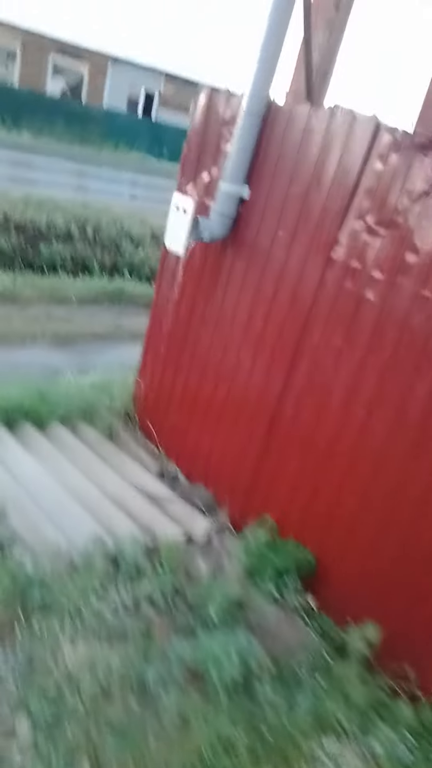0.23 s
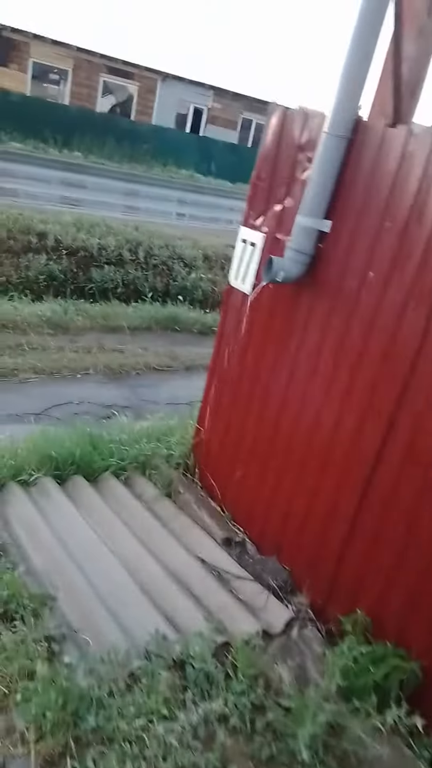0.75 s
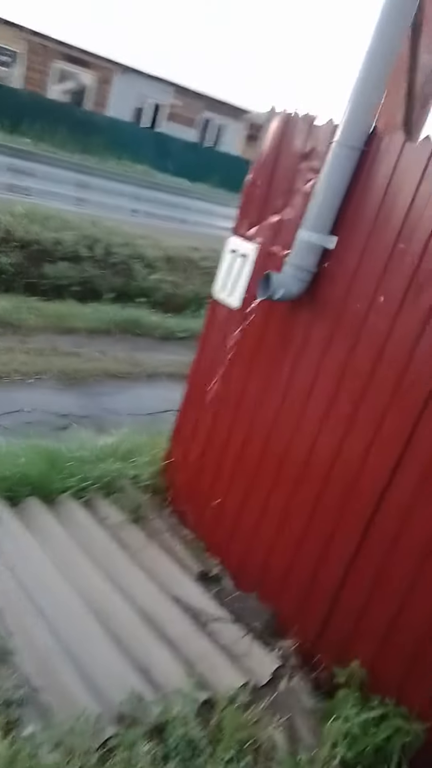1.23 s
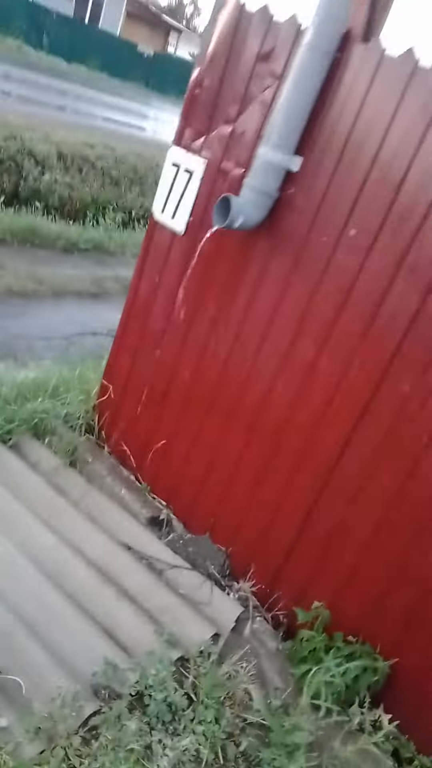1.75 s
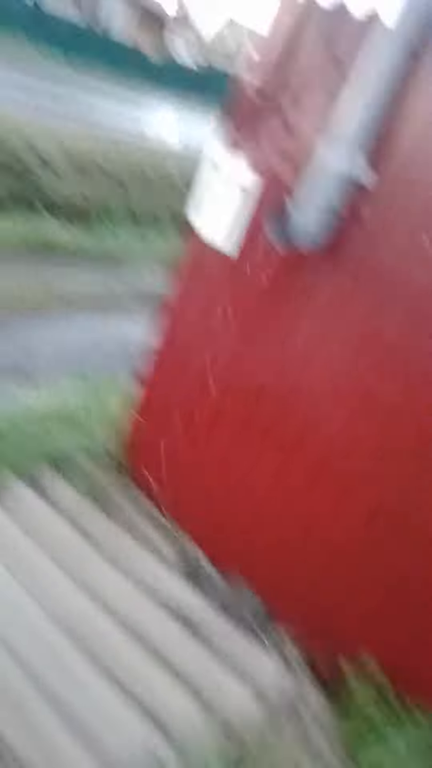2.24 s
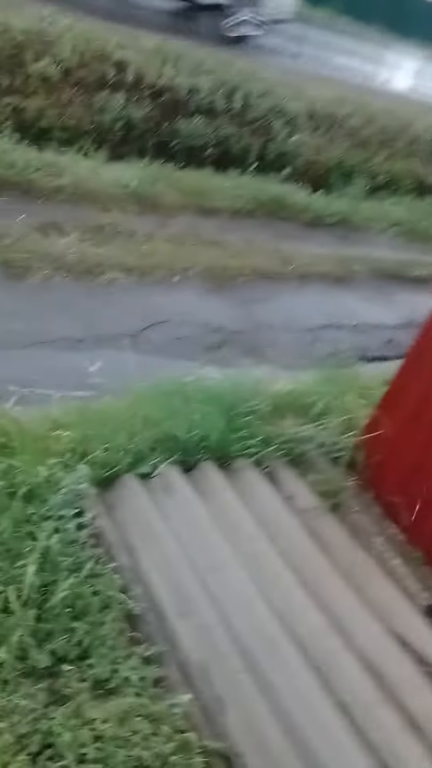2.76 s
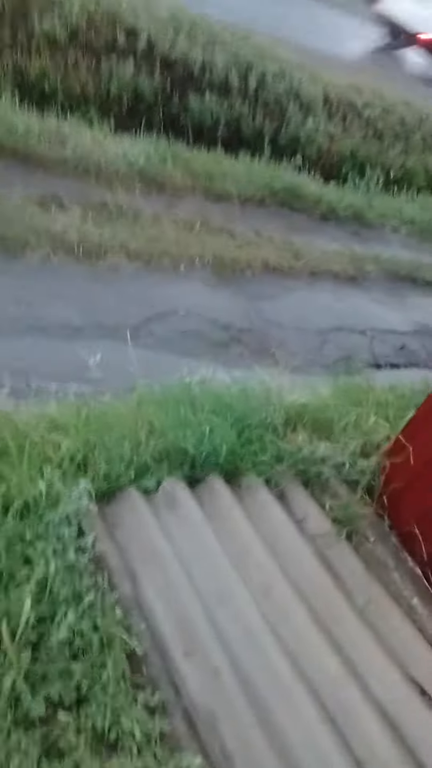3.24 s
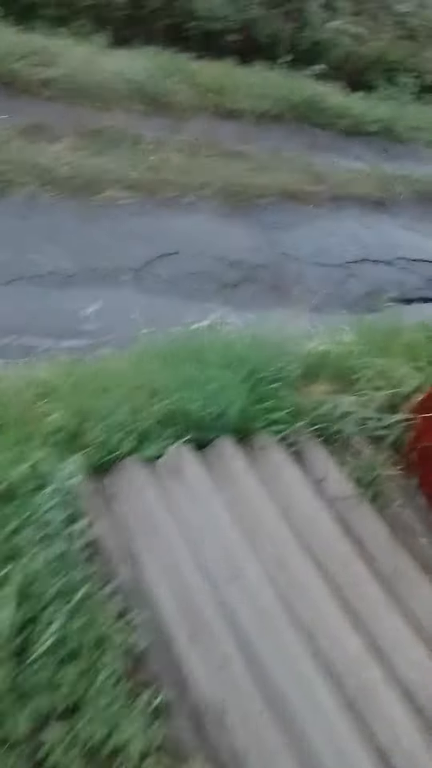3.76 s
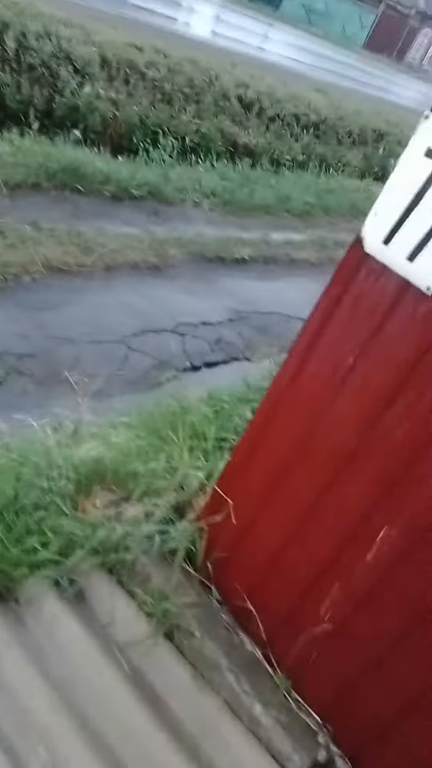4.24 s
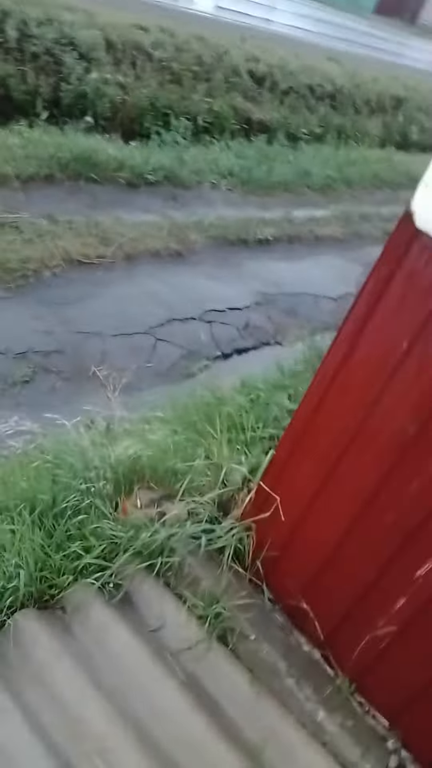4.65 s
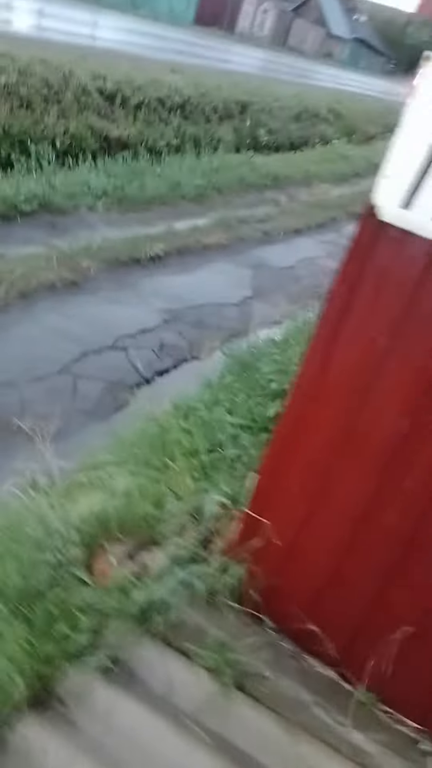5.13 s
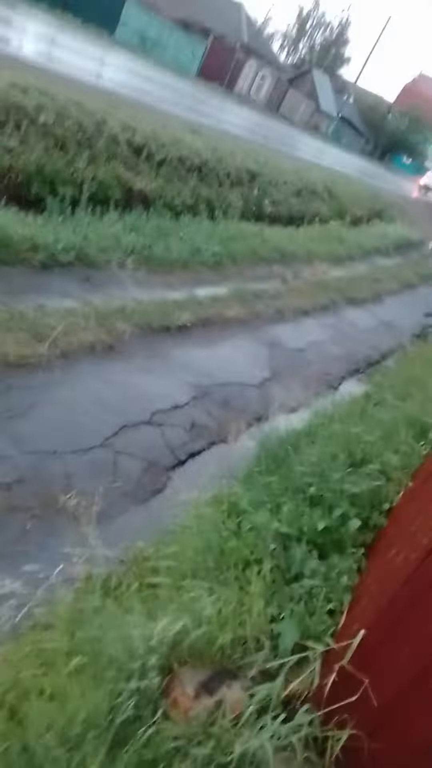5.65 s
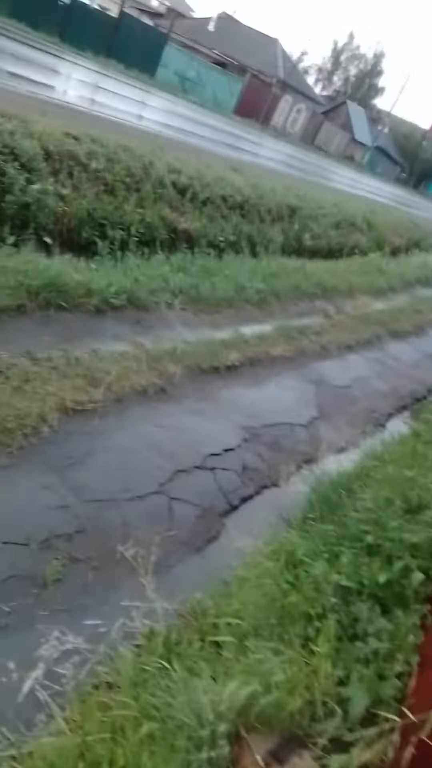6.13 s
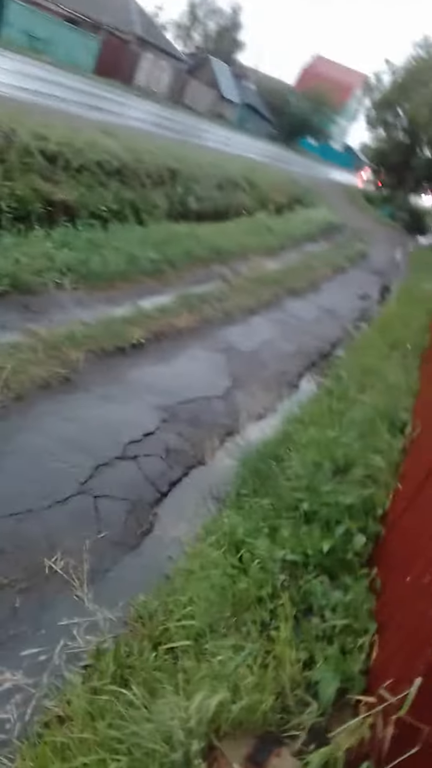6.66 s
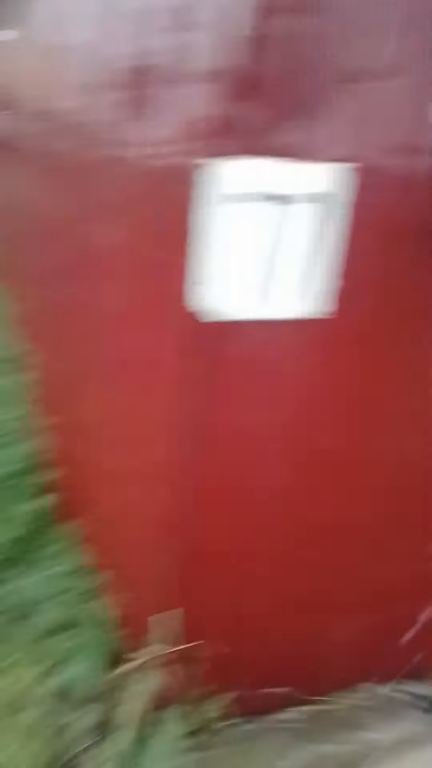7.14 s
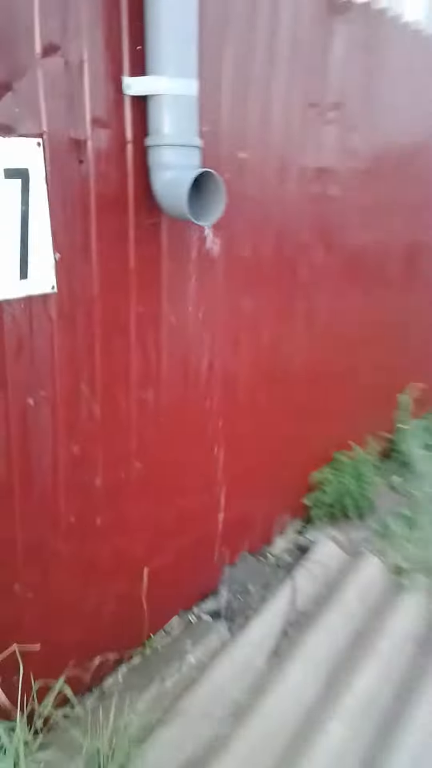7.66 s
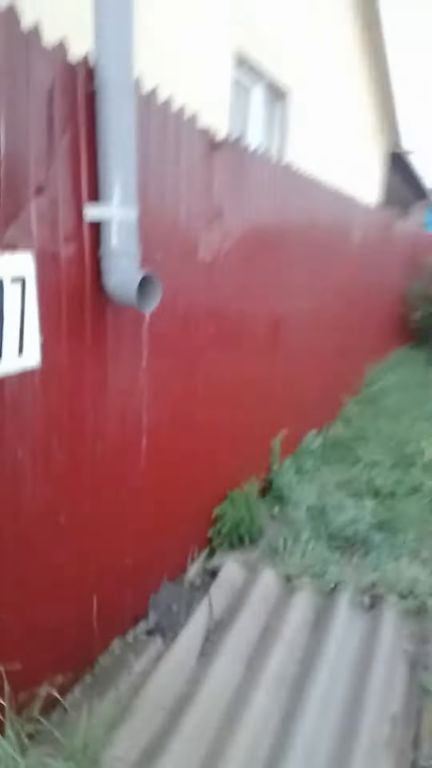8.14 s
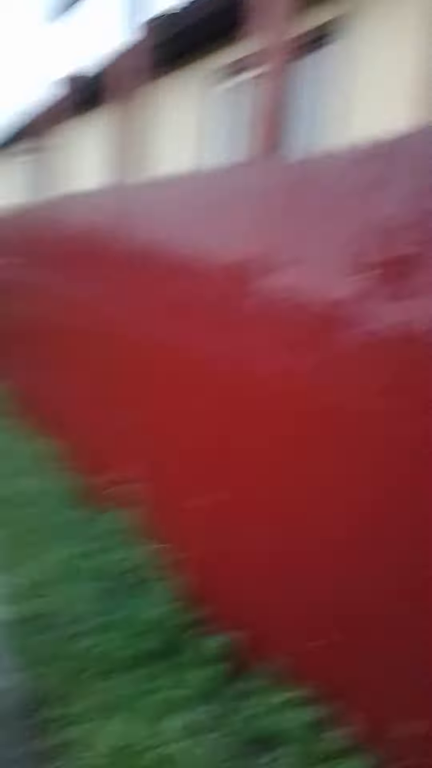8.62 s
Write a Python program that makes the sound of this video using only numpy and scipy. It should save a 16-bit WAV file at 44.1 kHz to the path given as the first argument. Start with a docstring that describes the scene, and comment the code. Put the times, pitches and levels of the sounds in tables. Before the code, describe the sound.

Outdoors beside a metal fence on a wet village street, a car approaches with a steady tyre hiss that swells into roaring spray and puddle slaps around two seconds, passes, and fades with its low engine note sinking. Faint traffic wash continues farther off, while drainpipe drops spatter close to a handheld microphone with a bright, slightly thin tone.

```python
"""A car comes on along a wet village road, heard from a gate beside a sheet-metal fence, as soft steps thud on grass.
Its tyres roar, throw up water and slap through puddles: shaped noise and droplets, with short reflections sweeping.
It goes by at 2.7 s and the engine note, a stack of firing orders, sinks; a low rush of noise follows.
From 4 s drops of drainpipe water spatter near by and more traffic swells farther off, as gliding roar and hiss.
The spatter thickens after 7 s; faint drips tick, and steps thud and narrow bands of noise swell now and then."""
import sys
import numpy as np
from scipy import signal
from scipy.fft import rfft, irfft, next_fast_len
from scipy.io import wavfile
from scipy.ndimage import map_coordinates

SR = 44100
rng = np.random.default_rng(int(sys.argv[2]) if len(sys.argv) > 2 else 0)


def wav_record(signal):
    """Record a signal, one row per channel, as 16-bit PCM in the file named by sys.argv[1]."""
    frames = np.transpose(np.atleast_2d(signal))
    bounded = np.clip(frames, -1, 1)
    # unit amplitude maps onto the largest positive 16-bit level
    quanta = np.round(bounded * 32767).astype(np.int16)
    wavfile.write(sys.argv[1], SR, quanta)


N = 392049
T = np.arange(N) / SR   # time in s

# Drops of drainpipe water close by: [t/s, relative level/dB, ring f/Hz, burst/ms, crackle against ring/dB]
WATER_DROPS = [(4.131, -26, 10980, 1.3, -2), (4.92, -32, 11000, 1.3, -2), (5.349, -29, 9970, 1.3, -2),
               (5.6558, -27, 10000, 1.3, -2), (7.2502, -15, 5200, 1.5, 3), (7.2775, -14.5, 4930, 1.5, -9),
               (7.311, -17, 6000, 1.6, 1), (7.377, -37, 9500, 7, -4), (7.4025, -24, 8100, 2.5, -4),
               (7.44, -30, 8200, 3.5, -1), (7.451, -22, 5500, 2, -5), (7.461, -32, 8000, 2, -7),
               (7.4924, -13.5, 5300, 1.5, -4), (7.501, -17, 5100, 1.5, -13), (7.527, -28, 9500, .7, -3),
               (7.607, -32, 8700, 4, -4), (7.704, -35, 8000, 2, -4), (7.812, -30, 7500, 2, -3),
               (7.8469, -21, 5470, 1.5, -3), (7.858, -28, 9500, 2.5, -2), (7.8698, -19, 6000, 1.3, 0),
               (7.934, -29, 7500, 1.3, 0), (7.958, -28, 9000, 1.3, -2), (7.9783, -19, 7350, 1.5, -4)]
# Soft steps and handling thuds: [t/s, level/dB, bell length/s, centre f/Hz]
SOFT_THUDS = [(.12, -45, .022, 110), (.22, -42, 0.063, 188), (.68, -44, 0.013, 109), (.86, -37, 0.022, 134),
              (1.545, -33, 0.01, 159), (1.655, -35, 0.017, 138), (4.04, -35.5, 0.017, 230),
              (4.05, -39, 0.024, 115), (4.085, -39, .014, 190), (6.74, -45, 0.012, 125),
              (8.73, -37, .01, 110), (8.775, -37.5, 0.0043, 167)]
# Faint bright rustles: [t/s, level/dB, bell length/s, centre f/Hz]
BRIGHT_RUSTLES = [(5.3, -51, .05, 12500), (6.76, -57, 0.08, 12500)]
DRIPS_PER_S, DRIPS_DB = 21, -33

# Swells of farther traffic: [t/s, length/s, tread level/dB, tread f/Hz, glide/Hz (added coming, taken off going),
# hiss level/dB, reflection lag/ms, lag drift/(ms per s), reflection strength 0-1]
FAR_PASSES = [(4.47, 0.19, -43.5, 986, -40.5, -40, 1.1, 0, .25),
              (5.095, 0.3, -48, 1085, -1.5, -46, 0.92, 0, 0.4),
              (6.3, 0.46, -45.5, 981, -30, -46, 1.3, 0, .15),
              (7.419, 0.33, -43, 919, 130, -38.5, 1.12, .2, 0.2),
              (8.448, 0.79, -47.5, 1147, 60, -39, 0.71, 0, 0.13)]
# Colour of the farther hiss: [f/Hz, level/dB per Hz]
FAR_HISS_COLOUR = [(900, -35), (1400, -6), (1950, 4), (2300, 0.5), (2750, 1.5), (3500, -3), (4500, -3.5),
                   (6000, -31), (9000, -29)]
FAR_TREAD_WIDTH_HZ, FAR_HISS_LAG_S = 340, 0.14

# Narrow bands of noise: tyre tones, and a quick squelch with a rising chirp at a splash:
# [t/s, bell length/s, level/dB, f/Hz, glide/(Hz per s), width/Hz]
NARROW_BANDS = [(.7, 0.27, -39, 3070, 0, 453), (1.349, 0.48, -33.5, 1910, 60, 800),
                (2.12, .012, -37, 1556, 9000, 150), (2.153, .008, -29, 2500, 55001, 300),
                (2.68, 0.11, -37, 862, -200, 360), (2.979, 0.11, -33.5, 1031, 899.5, 300),
                (3.418, 0.31, -37.5, 2913, 300, 450), (3.502, 0.16, -43, 1617, 300.5, 350),
                (4.6, 0.42, -48, 4760, 0, 450), (5.1, .07, -42, 3320, -0.5, 400),
                (5.418, 0.24, -42.5, 2210, -150, 400), (5.36, 0.12, -41, 4420, -1.5, 500),
                (5.972, 0.099, -45, 5950, -400, 450), (6.45, 0.47, -45.5, 1390, 1, 252),
                (7.15, 0.089, -43, 1035, -250, 250), (7.3, 0.26, -45, 1887, -300, 280),
                (7.58, 0.16, -40.5, 2715, -150, 550), (7.981, .09, -44, 2040, -700, 400)]

# Colours of the car's tyre sounds, from low rumble to fine mist: [f/Hz, level/dB per Hz]
RUMBLE_COLOUR = [(20, -43), (40, -43), (70, -15), (120, -8), (170, -5), (230, 0.5), (300, 0.5), (390, 0.5),
                 (490, 0.5), (580, -3), (690, -4), (900, 1), (1600, -26)]
SLOSH_COLOUR = [(900, -60), (1250, -4), (1600, -1), (2200, 0), (3000, -2.5), (4000, -4.5), (6000, -8)]
SPRAY_COLOUR = [(2000, -7), (3200, -1), (4200, 2.5), (5400, 0.5), (6500, 3.5), (7600, 0), (8600, -9.5),
                (10000, -20.5), (14000, -53)]
MIST_COLOUR = [(5500, -12), (8000, 3), (9500, 0.5), (11500, -3), (13500, -4.5), (16000, -10)]
# Short puddle slaps, and longer swells of spray and bright mist: [t/s, level/dB, bell length/s, centre f/Hz]
PUDDLE_SPLASHES = [(.3, -31, 0.024, 1690), (1.353, -22, 0.005, 4970), (1.356, -24.5, 0.015, 1650),
                   (1.5, -33, 0.28, 12400), (1.535, -28, 0.008, 2000), (1.8, -22.5, 0.0075, 6500),
                   (1.87, -26, 0.011, 6400), (2.01, -29, 0.015, 6000), (2.14, -20, 0.012, 2650),
                   (2.28, -23.5, 0.12, 3130), (2.46, -21.5, 0.02, 6100), (2.95, -29, 0.15, 6830),
                   (2.97, -46, 0.14, 14000), (5.53, -38.5, 0.064, 6200)]
# Loudness of the wet tyres, which steers rumble, tread and thrown water: [t/s, level/dB]
WET_TYRE_LEVEL = [(0, -25), (.28, -24.5), (.6, -26.5), (1.05, -24.5), (1.38, -21.5), (1.7, -18),
                  (1.82, -16), (2.05, -13.5), (2.35, -17.5), (2.95, -19.5), (3.15, -22), (3.42, -24.5),
                  (4.05, -34), (5.15, -34), (5.52, -33.5), (5.9, -36), (7.15, -41.5), (8.62, -40.5),
                  (8.89, -34.5)]
ABREAST_S, PASS_S = 2.7, .35   # the car is nearest; time it takes to cover its distance from the gate
EMERGE_S, EMERGE_TAKES_S = 1.65, 0.16   # it comes out from behind the fence
# How each tyre sound follows the wet-tyre level: [level at the loudest hiss/dB, share of the hiss's swing,
# added coming on/dB, added abreast/dB, added behind the fence/dB]
RUMBLE_BALANCE = (-34.5, 0.5, 0.1, -1, 3.5)
TREAD_BALANCE = (-36, 0.42, 1.5, 0.5, 1)
SLOSH_BALANCE = (-21.5, 0.72, 0.64, -2, 0)
SPRAY_BALANCE = (-20, 0.9737, -1.8, 0.5, 3.5)
MIST_BALANCE = (-29, 0.93, 1.4, 6, -4)
# Trim of the finest mist, above 11.5 kHz: base, added coming on, added abreast
MIST_TOP_DB, MIST_TOP_AHEAD_DB, MIST_TOP_ABREAST_DB = -5, 3.5, -14
TREAD_HZ, TREAD_DIP_HZ, TREAD_WIDTH_HZ = 1056.7, 275, 410   # the roar sinks by the dip when abreast

# Engine firing rate: [t/s, f/Hz]
FIRING_RATE = [(0, 72), (1.1, 72), (1.5, 70.7), (1.95, 71.5), (2.18, 69.8), (2.4, 62.8), (2.58, 59),
               (2.75, 57.1), (2.97, 55.7), (3.15, 52.7), (3.3, 50.6), (3.6, 49.4), (3.95, 48.2),
               (4.3, 47.2), (6.1, 48.2), (7.7, 49.8), (8.89, 49)]
# Engine loudness: [t/s, level/dB]
ENGINE_LOUDNESS = [(0, -72.5), (.75, -66), (1, -57.5), (2, -47.5), (2.18, -49), (2.36, -46.5), (2.75, -42),
                   (3.05, -49), (3.3, -57), (4.25, -69), (5, -68.5), (5.6, -72.5), (7.2, -65),
                   (8.89, -74.5)]
# Firing orders 1 to 5: [relative level/dB, added abreast/dB, added coming on/dB]
FIRING_ORDERS = [(-11.5, 1, -6), (-1.5, -4.5, -0.5), (0, 2.5, -2), (-1, -3, -2.5), (-9, -2, -4)]
# Exhaust resonances: [f/Hz, width/Hz, boost/dB]
EXHAUST_BOOMS = [(144.1, 10, 13.5), (275, 15, 12)]
WAKE_S, WAKE_LENGTH_S, WAKE_DB, WAKE_HZ = 3.5, 0.41, -41.5, 504   # a low rush follows the car

# Short reflection from a near surface, its lag sweeping as the car goes by:
# [t/s, extra travel time/ms, strength 0-1]
NEAR_REFLECTION = [(0, .53, .04), (1.65, .5, .06), (1.85, .54, .12), (2.1, .61, .15), (2.4, .66, .12),
                   (2.58, .9, .12), (2.68, .95, .24), (2.9, .835, .24), (3.02, .74, .23), (3.18, .65, .23),
                   (3.4, .63, .21), (3.6, .585, .24), (3.78, .6, .21), (4, .7, .09), (4.3, .88, .05),
                   (5.2, .9, .07), (5.5, .975, .2), (5.8, .88, .08), (6.5, .66, .05), (8.89, .9, .05)]
# The reflected paths: [lag after the first path/ms, signed share of the reflection's strength]
REFLECTED_PATHS = [(0, 1), (.05, -.5), (.1, .65), (.24, -.5), (.44, .3), (.7, .3)]
REFLECT_BAND_HZ = (1900, 15500)   # mostly short waves are mirrored
REFLECT_FLICKER, REFLECT_JITTER_MS = .35, .008   # spread of strength and lag; the sweep is broken up
# One more reflection, of the lower range only, while the car is coming on
ONCOMING_LAG_MS, ONCOMING_STRENGTH, ONCOMING_BELOW_HZ = 0.52, 0.1, 4900

PORT_HZ, PORT_WIDTH_HZ, PORT_DB = 7124, 940, 9.5
CUTOFF_HZ = 15900


def from_db(db):
    """Decibels to gain."""
    return 10 ** (np.asarray(db) / 20)


def rms_one(x):
    """Scale to unit power."""
    return x / np.sqrt(np.mean(x ** 2) + 1e-20)


def in_time(rows):
    """One curve per column, joined by straight lines."""
    s, *columns = np.transpose(rows)
    return [np.interp(T, s, column) for column in columns]


def bell(s, length):
    """A smooth swell that peaks at 1 at time s."""
    return np.exp(-.5 * ((T - s) / length) ** 2)


def filtered(x, order, hz, kind):
    """Butterworth filter."""
    return signal.sosfilt(signal.butter(order, hz, kind, fs=SR, output="sos"), x)


def filtered_in_step(x, hz, kind):
    """Butterworth filter run both ways, so the result stays in step with x."""
    return signal.sosfiltfilt(signal.butter(2, hz, kind, fs=SR, output="sos"), x)


def drift(rate):
    """Smooth chance of spread 1, changing about rate times a second."""
    count = N // 20   # one value per 20 samples
    hz = np.fft.rfftfreq(count, 20 / SR)
    slow = irfft(rfft(rng.standard_normal(count)) / (1 + (hz / rate) ** 2))
    return np.interp(np.arange(N) / 20, np.arange(len(slow)), rms_one(slow))


def coloured(x, spectrum):
    """Give x a spectrum; unit power."""
    size = next_fast_len(N)
    hz, db = np.transpose(spectrum)
    log_hz = np.log(np.fft.rfftfreq(size, 1 / SR) + 1)
    gain = from_db(np.interp(log_hz, np.log(hz), db, left=-np.inf, right=-np.inf))
    return rms_one(irfft(rfft(x, size) * gain, size)[:N])


def resonate(x, hz, width_hz):
    """A resonance with gain 1 at its top."""
    r = np.exp(-np.pi * width_hz / SR)
    feed = np.array([1, 0, -1]) * (1 - r * r) / 2
    return signal.lfilter(feed, [1, -2 * r * np.cos(2 * np.pi * hz / SR), r * r], x)


def resonate_twice(x, hz, width_hz):
    """Two equal resonances in a row, for steeper sides."""
    return resonate(resonate(x, hz, width_hz), hz, width_hz)


def gliding_band(hz, width_hz):
    """A band of noise whose centre follows hz; unit power."""
    a, b = filtered(rng.standard_normal((2, N)), 2, width_hz / 2, "low")
    phase = 2 * np.pi * np.cumsum(hz) / SR
    return rms_one(a * np.cos(phase) + b * np.sin(phase))


def shaped(noise, envelope):
    """Noise under an envelope, with the energy of that envelope."""
    return rms_one(noise * envelope) * np.sqrt(np.mean(envelope ** 2))


def add(out, s, sound):
    """Mix a sound in at time s."""
    sound = sound[max(-int(s * SR), 0):]
    start = int(np.clip(s * SR, 0, N))
    out[start:start + len(sound)] += sound[:N - start]


def droplets(per_s, spread_db):
    """Tiny impacts at random moments, a few much larger than the rest."""
    born = rng.random(N) < per_s / SR
    size_db = spread_db * np.minimum(rng.exponential(1, N), 4)
    return born * rng.choice([-1, 1], N) * from_db(size_db)


def swells(rows, relative_width):
    """Bell-shaped bursts of noise, each in a broad resonance."""
    out = np.zeros(N)
    t = np.arange(-SR, SR) / SR
    for s, db, length, hz in rows:
        burst = resonate_twice(rng.standard_normal(len(t)), hz, relative_width * hz)
        add(out, s + t[0], from_db(db) * shaped(burst, np.exp(-.5 * (t / length) ** 2)))
    return out


def bearing(s, pass_s):
    """For a vehicle nearest at time s: ahead runs from 1 (coming) to -1 (going), abreast peaks at 1."""
    along = (s - T) / pass_s
    abreast = 1 / (1 + along ** 2)
    return along * np.sqrt(abreast), abreast


def reflected(x, mirror, paths):
    """The mirrored sound comes by longer paths (lag ms, strength) and cuts notches; power stays about the same."""
    out, power = x, 1
    for lag_ms, strength in paths:
        late = map_coordinates(mirror, [np.arange(N) - lag_ms * SR / 1000], order=3)
        out = out + strength * late
        power = power + strength ** 2
    return out / np.sqrt(power)


def drips():
    """Stray drips tick faintly at random moments."""
    return from_db(DRIPS_DB) * resonate(droplets(per_s=DRIPS_PER_S, spread_db=2.0), 9300, 4400)


def rustles():
    """Faint bright rustles are bell-shaped puffs of high noise."""
    return swells(BRIGHT_RUSTLES, relative_width=0.89)


def thuds():
    """Soft steps and handling thuds are short low bursts, kept clear of the deepest bass."""
    return filtered(swells(SOFT_THUDS, relative_width=0.89), 3, 55, "high")


def spatter(rise_s, decay_s, tail_db, tail_s, ring_width_hz):
    """Each drop bursts in a few milliseconds of bright crackle, then scatters faintly."""
    out, t = np.zeros(N), np.arange(SR // 20) / SR
    for s, db, hz, burst_ms, crackle_db in WATER_DROPS:
        after_burst = np.maximum(t - burst_ms / 1000, 0)
        fall = np.exp(-after_burst / decay_s) + from_db(tail_db) * np.exp(-t / tail_s)
        shape = (1 - np.exp(-t / rise_s)) * fall
        ring, crackle = rng.standard_normal((2, len(t)))
        burst = rms_one(resonate_twice(ring, hz, ring_width_hz)) + from_db(crackle_db) * crackle
        add(out, s, from_db(db - 12.5) * shaped(burst, shape))
    return filtered(out, 2, [2100, 13500], "band")


def far_traffic():
    """Each swell is a tread roar gliding in pitch, wet hiss just behind it and one reflection, with the bass cut."""
    out = 0
    for s, length, tread_db, tread_hz, glide_hz, hiss_db, lag_ms, ms_per_s, strength in FAR_PASSES:
        ahead, _ = bearing(s, length)
        tread = from_db(tread_db) * gliding_band(tread_hz + glide_hz * ahead, FAR_TREAD_WIDTH_HZ)
        hiss = from_db(hiss_db) * coloured(rng.standard_normal(N), FAR_HISS_COLOUR)
        swell = bell(s, length)
        late_swell = np.interp(T - FAR_HISS_LAG_S, T, swell)
        direct = tread * swell + hiss * late_swell
        out = out + reflected(direct, direct, [(lag_ms + ms_per_s * (T - s), strength)])
    return filtered(out, 4, 650, "high")


def narrow_bands():
    """Tyre tones, and a squelch and rising chirp at a splash: each a band of noise that swells and fades."""
    out = 0
    for s, length, db, hz, glide, width_hz in NARROW_BANDS:
        band = gliding_band(hz + glide * (T - s), width_hz)
        out = out + from_db(db) * bell(s, length) * band
    return out


def heard_db(balance):
    """Level of one tyre sound: it follows the hiss and shifts as the car emerges from the fence and goes by."""
    loudest_db, share, ahead_db, abreast_db, hidden_db = balance
    hiss_db, = in_time(WET_TYRE_LEVEL)
    ahead, abreast = bearing(ABREAST_S, PASS_S)
    # out from behind the fence there is more mist, less rumble and spray
    hidden = .5 + .5 * np.tanh((EMERGE_S - T) / EMERGE_TAKES_S)
    swing_db = share * (hiss_db - hiss_db.max())
    return loudest_db + swing_db + ahead_db * ahead + abreast_db * abreast + hidden_db * hidden


def wake():
    """A low rush of noise swells up behind the car."""
    return from_db(WAKE_DB) * bell(WAKE_S, WAKE_LENGTH_S) * gliding_band(np.full(N, WAKE_HZ), width_hz=360)


def engine():
    """The firing orders sink in pitch as the car goes by; whichever lies on an exhaust resonance booms."""
    hz, = in_time(FIRING_RATE)
    level_db, = in_time(ENGINE_LOUDNESS)
    phase = 2 * np.pi * np.cumsum(hz * (1 + 0.003 * drift(4.3))) / SR
    ahead, abreast = bearing(ABREAST_S, PASS_S)
    out = 0
    for k, (db, abreast_db, ahead_db) in enumerate(FIRING_ORDERS, 1):
        boom = 1
        for boom_hz, width_hz, boom_db in EXHAUST_BOOMS:
            off_centre = 2 * (k * hz - boom_hz) / width_hz
            boom = boom + (from_db(boom_db) - 1) / (1 + off_centre ** 2)
        order_db = level_db + db + abreast_db * abreast + ahead_db * ahead + 1.1 * drift(4.0)
        out = out + boom * from_db(order_db) * np.sin(k * phase)
    return out


def tyres():
    """The rolling tyres rumble, and air pumped from the tread roars near 1 kHz."""
    _, abreast = bearing(ABREAST_S, PASS_S)
    rumble = from_db(heard_db(RUMBLE_BALANCE)) * coloured(rng.standard_normal(N), RUMBLE_COLOUR)
    roar = gliding_band(TREAD_HZ - TREAD_DIP_HZ * abreast ** 2, TREAD_WIDTH_HZ)
    tread = from_db(heard_db(TREAD_BALANCE) + 1.0 * drift(22)) * roar
    return rumble + tread


def thrown_water():
    """Slosh, spray and mist: noise and countless droplets that the uneven water film makes surge together."""
    ahead, abreast = bearing(ABREAST_S, PASS_S)
    film = drift(13) * (1 + 0.65 * abreast)
    slosh_db = heard_db(SLOSH_BALANCE) + 0.2 * film + 0.78 * drift(11.0)
    slosh = from_db(slosh_db) * coloured(rng.standard_normal(N), SLOSH_COLOUR)
    spray_db = heard_db(SPRAY_BALANCE) + 0.93 * film + 0.27 * drift(35)
    spray = from_db(spray_db) * coloured(droplets(per_s=20000, spread_db=3.0), SPRAY_COLOUR)
    mist_db = heard_db(MIST_BALANCE) + .5 * film
    mist = from_db(mist_db) * coloured(droplets(per_s=12000, spread_db=3.0), MIST_COLOUR)
    top_db = MIST_TOP_DB + MIST_TOP_AHEAD_DB * ahead + MIST_TOP_ABREAST_DB * abreast
    top_trim = (from_db(top_db) - 1) * filtered_in_step(mist, 11500, "high")
    return slosh + spray + mist + top_trim


def splashes():
    """Puddle slaps in short bursts of resonant noise, and longer swells of spray and bright mist."""
    return swells(PUDDLE_SPLASHES, relative_width=0.64)


def car():
    """Tyres and water with their short reflections, the low rush behind, and the engine."""
    direct = tyres() + thrown_water() + splashes()
    ahead, _ = bearing(ABREAST_S, PASS_S)
    lows = filtered_in_step(direct, ONCOMING_BELOW_HZ, "low")
    direct = reflected(direct, lows, [(ONCOMING_LAG_MS, ONCOMING_STRENGTH * np.maximum(ahead, 0))])
    mirror = filtered_in_step(direct, REFLECT_BAND_HZ, "band")
    first_lag_ms, full_strength = in_time(NEAR_REFLECTION)
    paths = []
    for later_ms, share in REFLECTED_PATHS:
        lag_ms = first_lag_ms + later_ms + REFLECT_JITTER_MS * drift(14)
        strength = full_strength * share * (1 + REFLECT_FLICKER * drift(8.9))
        paths.append((lag_ms, strength))
    return reflected(direct, mirror, paths) + wake() + engine()


def scene():
    """The small sounds near by, the farther traffic and the car; alike in both ears."""
    drops = spatter(rise_s=0.00023, decay_s=0.00084, tail_db=-12.0, tail_s=0.0058, ring_width_hz=2800)
    near = drips() + rustles() + thuds() + drops
    return np.tile(near + far_traffic() + narrow_bands() + car(), (2, 1))


def record(dry):
    """The microphone port rings near 7 kHz; the top is cut."""
    voiced = dry + (from_db(PORT_DB) - 1) * resonate(dry, PORT_HZ, PORT_WIDTH_HZ)
    return signal.sosfilt(signal.ellip(12, .1, 80, CUTOFF_HZ, fs=SR, output="sos"), voiced)


dry = scene()
out = record(dry)
wav_record(out)
```